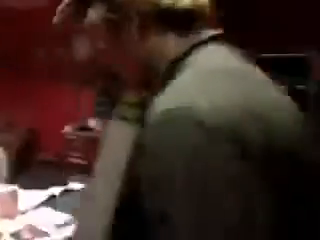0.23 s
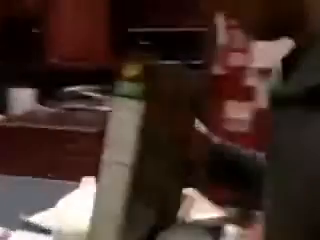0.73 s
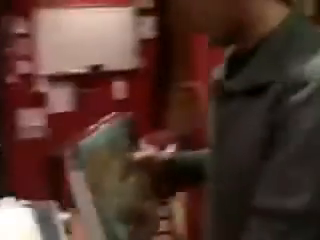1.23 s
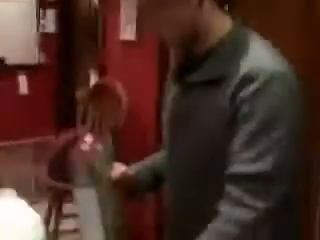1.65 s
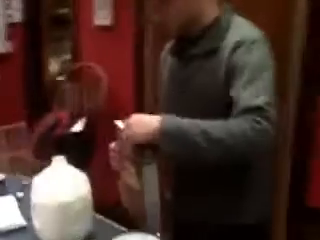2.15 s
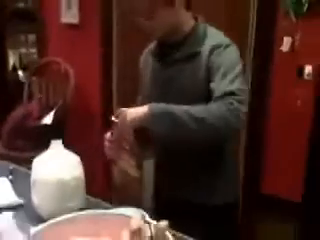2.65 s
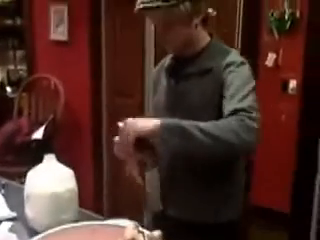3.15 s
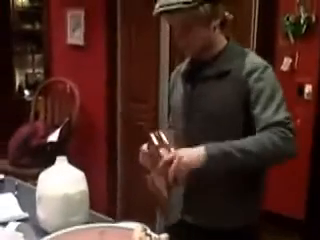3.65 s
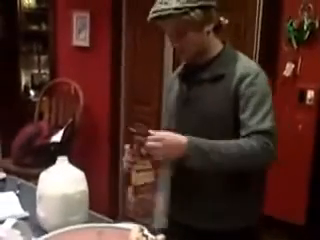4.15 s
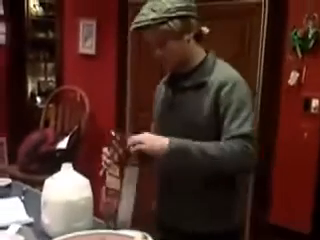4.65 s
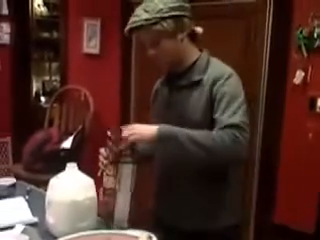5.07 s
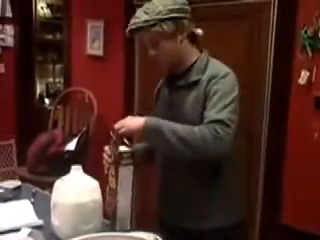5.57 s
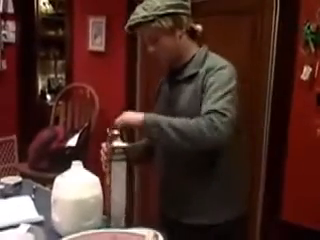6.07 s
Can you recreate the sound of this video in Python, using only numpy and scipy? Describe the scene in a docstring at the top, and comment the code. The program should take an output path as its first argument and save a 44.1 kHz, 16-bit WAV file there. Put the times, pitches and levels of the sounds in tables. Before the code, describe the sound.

In a quiet kitchen, handling rumble and rustle, a bowl knocks down twice with bright clinks, then a cardboard box is pried open in crisp snaps.

```python
"""Bowl and cereal box in a hard kitchen

A bowl is knocked down twice on a counter: noise bursts thud, damped modes ring, each knock has a bright clink.
A cereal box is pried open: glue cracks as impulse bursts, fibres tear as grain streams, flaps thump the hollow box.
Fingers rub and tap box and bag as enveloped grains, above handling rumble, cloth, room noise and a faint hum.
Reflections follow blows, rubbing and tearing; a firm-kneed overload and a band limit act on the sum."""
import sys
import numpy as np
from scipy import signal
from scipy.fft import rfft, irfft
from scipy.io import wavfile

SR = 44100
rng = np.random.default_rng(int(sys.argv[2]) if len(sys.argv) > 2 else 0)


def to_wav(s):
    """Save 16-bit WAV."""
    ch = np.atleast_2d(s).T  # columns
    pcm = np.round(np.clip(ch, -1, 1) * 32767)  # PCM
    wavfile.write(sys.argv[1], SR, pcm.astype(np.int16))


N = 278271
TIME = np.arange(N) / SR

# Levels in the tables are relative: each source adds its own offset or normalises the spectrum.
# Spectrum of the room noise and hiss: f/Hz, level/dB
FLOOR_SPECTRUM = [(12, -20), (20, 6.5), (49, 1), (101, -7.5), (162, -6), (210, -7), (568, -14),
                  (664, -12.5), (1040, -21), (1610, -23.5), (1790, -26), (4590, -25.5), (6290, -15.5),
                  (9550, -40), (10300, -60.5), (13400, -83), (22000, -120)]
# Hum of a refrigerator: mean f/Hz, rms level/dB
HUM_TONES = [(57, -61.5), (148, -57)]
# Handling: t/s, rumble level/dB, cloth level/dB
HANDLING_LEVELS = [(0.0, -36, -41), (0.266, -48, -48.5), (0.412, -37, -53), (0.668, -47, -42),
                   (0.782, -44, -52), (1.042, -39, -47), (1.092, -51, -55), (1.198, -40, -56),
                   (1.3, -42, -55)]
# Spectrum of the sleeves: f/Hz, level/dB
CLOTH_SPECTRUM = [(60, -3), (140, 9), (300, -1.5), (700, -4), (1200, -26), (3000, -34)]
# Spectrum of the low handling rumble: f/Hz, level/dB
RUMBLE_SPECTRUM = [(8, -9), (25, 11), (45, -22), (80, -16.5), (160, -23), (400, -78)]
# Fingers sliding over box and bag: middle t/s, Gaussian width/s, level/dB, brightness/(dB per octave)
RUB_STROKES = [(0.1, 0.098, -42.5, -0.5), (0.37, 0.054, -38, 3), (0.638, 0.11, -42, -1.5),
               (0.912, 0.11, -44, -0.5), (1.128, .08, -45.5, 2.5), (1.976, 0.032, -41, 11),
               (2.21, 0.032, -40, 2.5), (3.245, 0.057, -42.5, 0.5), (3.501, .034, -47, -0.2),
               (4.36, 0.041, -42.5, 0.5), (4.562, 0.043, -40, -0.5), (5.124, 0.013, -31.5, 1),
               (5.342, 0.027, -37.5, 3), (6.123, 0.03, -46.5, 4)]
# Spectrum of hands sliding over cardboard and plastic, before tilting: f/Hz, level/dB
RUB_SPECTRUM = [(290, -50.5), (500, -3.5), (546, -19.5), (841, 1), (1110, -9), (2730, -6.5), (3700, -8.5),
                (6300, -2), (7060, -2.5), (8020, -21), (9100, -16.5), (9820, -38), (10300, -52),
                (13400, -77), (22000, -120)]
# Clearest crinkles of the bag and fingernail taps: t/s, level/dB
TICK_EVENTS = [(0.7223, -17), (0.8778, -30), (0.9247, -31.5), (1.9486, -32.5), (2.174, -36.5),
               (2.488, -30.5), (3.3857, -30), (4.1327, -40), (4.8407, -35), (4.9879, -33), (5.0835, -29.5),
               (5.1058, -27), (5.3622, -25), (5.5115, -32), (6.2314, -28)]
# Bumps of the hands on the box: t/s, level/dB, stiffness of the spot as a factor on f
BUMP_EVENTS = [(0.7231, -24.5, 0.56), (2.051, -42.5, 1.19), (4.344, -41, 0.47), (4.56, -42.5, 0.96),
               (5.335, -42, 1.26), (5.731, -45.5, 1.33), (5.950, -32, 0.92)]
# Contacts of bowl and counter: t/s, rim level/dB, base level/dB, hard-edge level/dB, clink level/dB
BOWL_CONTACTS = [(1.3430, -12, -16.5, -15.5, -11), (1.385, -17.5, -16, -23, -36),
                 (1.6746, -32.5, -29.5, -41, -40), (1.6850, -19, -22, -23.5, -21.5),
                 (1.7040, -19.5, -26, -27.5, -42)]
# Modes of counter and bowl: f/Hz, level/dB, undamped 60 dB decay time/s
COUNTER_MODES = [(167.5, -22, 0.22), (242, -22, .18), (306.7, -4.5, 0.27), (456, -2.5, 0.1), (596, 1, 0.23),
                 (625.4, 2, 0.14), (614, -10, 0.23), (750, -1, 0.17), (889, 0, 0.13), (985, -16, 0.079),
                 (1080, -22, 0.048), (1326, -9.5, 0.16), (1823, -1.5, 0.046), (3040, -22, 0.26),
                 (3120, -11, 0.049)]
# Modes of the clink: f/Hz, level/dB, 60 dB decay time/s
CLINK_MODES = [(6880, 3.5, 0.083), (9200, -14.5, 0.066)]
# Spectrum of the thud of rim and base: f/Hz, level/dB
THUD_SPECTRUM = [(40, -18), (110, -11.5), (240, 2), (400, -2.5), (700, 1.5), (950, 1), (1500, -16),
                 (2500, -33.5), (5000, -36.5), (10000, -53)]
# Spectrum of the rim's hard edge: f/Hz, level/dB
EDGE_SPECTRUM = [(100, 0.5), (700, -6), (1800, 4.5), (3000, 4), (4500, -0.5), (6400, 3.5), (7600, -6.5),
                 (9500, -27.5), (11000, -42)]
# Flaps giving way: t/s, crack level/dB, crack decay/s, box thump level/dB, tear level/dB,
# tear length/s, brightness/(dB per octave), level of the grip before it/dB
FLAP_SNAPS = [(2.7704, -13, .0011, -21.5, -24, 0.023, 2.5, -43),
              (3.4426, -31, 0.0016, -49.5, -46, 0.033, 3.5, -45.5),
              (3.6184, -28, 0.0044, -39, -33, 0.02, -0.5, -67),
              (3.7524, -24, 0.005, -30, -25, 0.052, -1, -39),
              (5.138, -14, 0.0022, -25.5, -30.5, 0.018, 0.5, -59),
              (5.856, -37.5, 0.0058, -39, -31, 0.022, 6, -49),
              (5.871, -22, 0.0094, -37, -23.5, 0.029, 1, -58),
              (6.2401, -38.5, .0025, -39.5, -33, 0.053, 2.5, -55),
              (6.3068, -15.5, 0.0047, -33.5, -26, .01, 5, -46)]
# Spectrum of cracking glue, fibres and crinkles, before tilting: f/Hz, level/dB
CRACK_SPECTRUM = [(150, -29), (700, -9.5), (1200, -16.5), (2000, -9.5), (2800, -12.5), (4000, -10),
                  (5200, -4.5), (6200, 1), (7000, -3), (7700, -13.5), (9000, -18.5), (10500, -43.5)]
# Spectrum of the hollow box, before any stiffness factor: f/Hz, level/dB
BOX_SPECTRUM = [(50, -32), (140, -8), (260, -1), (380, -3), (560, -8), (790, 0.5), (920, -4), (1100, -14),
                (2000, -17.5), (5000, -50)]
# Reverberation of the room: f/Hz, 60 dB decay time/s
ROOM_DECAY = [(100, 0.38), (300, 0.61), (800, 0.53), (2500, 0.6), (5000, 0.52), (7000, 0.48), (10000, 0.52)]

FLOOR_DB = -46
GRIP_LEAD_S, GRIP_WIDTH_S, GRIP_DB_PER_OCTAVE = 0.05, 0.077, 3.1  # fingers slide before each snap
NEAR_ROOM_DB, FAR_ROOM_DB, WALK_S = -6.5, 0, (0.85, 3.8)  # the box is carried into the room's sound
BOWL_ROOM_DB, BASE_LAG_S = 1.5, 0.01  # the base comes down just after the rim
CATCH_S, CATCH_DB = 0.0043, -6.5  # the glue catches again at even steps, weaker each time
FIBRES_PER_S, TEAR_SWELL_DB = 300, 2  # a tear grows as it runs, then stops
THUMP_LAG_S, REBOUND_S, REBOUND_DB = 0.003055, 0.02, -5  # the flap hits the box, and once more
CUTOFF_HZ = 10150


def amp(db):
    """Logarithmic level: decibels become an amplitude ratio."""
    return 10 ** (np.asarray(db) / 20)


def unit(x):
    """Root-mean-square normalisation to 1."""
    return x / np.sqrt(np.mean(x ** 2) + 1e-20)


def blow(x):
    """Energy normalisation: the energy of a hundredth of a second at rms 1."""
    return x * np.sqrt(SR / 100 / np.sum(x ** 2))


def read(points, hz):
    """Logarithmic frequency scale: interpolates a table along it."""
    f, value = np.transpose(points)
    return np.interp(np.log(hz + 1), np.log(f + 1), value)


def causal(gain):
    """Minimum phase: the fastest-starting spectrum of this gain, over the full circle of frequencies."""
    return np.exp(np.conj(signal.hilbert(np.log(gain + 1e-5))))


def colour(x, points, size=4096):
    """Linear filtering: convolution with the minimum-phase response of a spectrum."""
    gain = amp(read(points, abs(np.fft.fftfreq(size, 1 / SR))))
    taps = np.fft.ifft(causal(gain)).real
    return signal.fftconvolve(x, taps[:size // 2])


def tilted(points, brightness, uneven_db=0):
    """Spectral tilt in dB per octave, with random unevenness as each spot of cardboard has."""
    hz, db = np.transpose(points)
    tilt = brightness * np.log2(hz / hz[0])
    return np.column_stack([hz, db + tilt + uneven_db * rng.standard_normal(len(hz))])


def noise(points):
    """Stationary random noise: white noise shaped to a spectrum, at rms 1."""
    white = rfft(rng.standard_normal(N))
    gain = amp(read(points, np.fft.rfftfreq(N, 1 / SR)))
    return unit(irfft(white * gain, N))


def grains(per_s, grain_db, points, size):
    """Shot noise: a random stream of coloured clicks of uneven size, at rms 1."""
    sizes = amp(grain_db * np.minimum(rng.exponential(1, size), 3)) * rng.choice([-1, 1], size)
    sounding = rng.random(size) < per_s / SR
    return unit(colour(sizes * sounding, points)[:size])


def burst(decay_s, grain_db, evenness=0.3, size=8192):
    """Decaying shot noise: uneven impulses, partly whitened so that little pitch remains."""
    sizes = amp(grain_db * np.minimum(rng.exponential(1, size), 4)) * rng.choice([-1, 1], size)
    spectrum = np.fft.fft(sizes * np.exp(-np.arange(size) / SR / decay_s))
    magnitude = abs(spectrum)
    ripple = causal((magnitude + magnitude.mean() / 10) ** evenness)
    return np.fft.ifft(spectrum / ripple).real[:size // 2]


def ring(modes):
    """Modal superposition: decaying sines, damped by the hand to a decay time of at most 0.2 s."""
    t = TIME[:SR // 2]
    total = np.zeros(len(t))
    for k, (hz, db, t60) in enumerate(modes):
        envelope = amp(db - 60 * t / min(t60, 0.2))
        total += (-1) ** k * envelope * np.sin(2 * np.pi * hz * t)
    return blow(total)


def kitchen(x, room_db, first_s=0.0017, build_s=0.0021, wall_gain=5.04, size=32768):
    """Reverberation: dense reflections of random sign, with a decay time that depends on frequency."""
    taps = np.zeros(size)
    at = np.arange(0, size - 10, 10)
    taps[at + rng.integers(0, 10, len(at))] = rng.choice([-1, 1], len(at))
    walls_s = rng.uniform(0.004, 0.06, size=7)
    taps[(walls_s * SR).astype(int)] = wall_gain * rng.choice([-1, 1], len(walls_s))  # near cupboards
    hz, t, bands = signal.stft(taps, SR, nperseg=256)
    decay = amp(-60 * t / read(ROOM_DECAY, hz)[:, None])
    tail = signal.istft(bands * decay, SR, nperseg=256)[1][:size]
    tail *= np.clip((TIME[:size] - first_s) / build_s, 0, 1)
    tail *= amp(room_db) / np.linalg.norm(tail)  # reflected energy against the direct path
    tail[0] = 1  # the direct path
    return signal.fftconvolve(x, tail)


def box_room(s):
    """Direct-to-reverberant ratio: the box's reflections gain on its direct sound with distance."""
    return np.interp(s, WALK_S, [NEAR_ROOM_DB, FAR_ROOM_DB])


def add(mix, s, sound):
    """Linear superposition: a sound joins the mix at a time."""
    part = mix[round(s * SR):][:len(sound)]
    part += sound[:len(part)]


def background(level_db=-0.5, waver_hz=1.38):
    """Stationary noise and frequency modulation: room noise and hiss, with a faint wavering hum."""
    drift = noise([(1, 0), (4, -6), (15, -60), (60, -120)])
    hum = np.zeros(N)
    for hz, db in HUM_TONES:
        phase = 2 * np.pi * np.cumsum(hz + waver_hz * drift) / SR  # waver is the rms deviation
        hum += amp(db) * np.sqrt(2) * np.sin(phase)
    return amp(FLOOR_DB + level_db) * noise(FLOOR_SPECTRUM) + hum


def handling(rumble_db=2.5, cloth_db=-1, stop_s=0.14):
    """Amplitude-modulated noise: rumble and cloth follow a hand's swing and die as it comes to rest."""
    s, low_db, sleeve_db = np.transpose(HANDLING_LEVELS)
    moving = np.clip((s[-1] - TIME) / stop_s, 0, 1)
    rumble = amp(rumble_db + np.interp(TIME, s, low_db)) * noise(RUMBLE_SPECTRUM)
    cloth = amp(cloth_db + np.interp(TIME, s, sleeve_db)) * noise(CLOTH_SPECTRUM)
    return moving * (rumble + cloth)


def rubbing(slips_per_s=3000, slip_db=-4, crinkles_per_s=55, crinkle_db=-10,
            room_db=-5.5, crinkle_room_db=-6):
    """Stick-slip friction: fine slips on cardboard and sparser bag crinkles swell and fade by stroke."""
    mix = np.zeros(N)
    grips = [(s - GRIP_LEAD_S, GRIP_WIDTH_S, grip_db, GRIP_DB_PER_OCTAVE)
             for s, *_, grip_db in FLAP_SNAPS]
    for middle, width, db, brightness in list(RUB_STROKES) + grips:
        start = max(middle - 0.2, 0)
        t = start + TIME[:SR // 2]
        pressure = amp(db) * np.exp(-((t - middle) / width) ** 2 / 2)
        slip_spectrum = tilted(RUB_SPECTRUM, brightness)
        slips = amp(slip_db) * grains(slips_per_s, 0.5, slip_spectrum, len(t))
        crinkle_spectrum = tilted(CRACK_SPECTRUM, brightness)
        crinkles = amp(crinkle_db) * grains(crinkles_per_s, 4, crinkle_spectrum, len(t))
        add(mix, start, kitchen(pressure * slips, room_db))
        add(mix, start, kitchen(pressure * crinkles, crinkle_room_db))
    return mix


def touches(tick_db=-11, tick_brightness=0.87, tick_room_db=-2, bump_room_db=3):
    """Impulse excitation: crinkles and nail taps are short and bright, bumps take the panel's colour."""
    mix = np.zeros(N)
    for s, db in TICK_EVENTS:
        spot = tilted(CRACK_SPECTRUM, tick_brightness, uneven_db=2.5)
        tick = blow(colour(burst(0.002, grain_db=5), spot))
        add(mix, s, kitchen(amp(db + tick_db) * tick, box_room(s) + tick_room_db))
    for s, db, stiffness in BUMP_EVENTS:
        panel = np.multiply(BOX_SPECTRUM, [stiffness, 1])  # a stiffer spot sounds higher
        bump = blow(colour(burst(0.0024, grain_db=3.5), panel))
        add(mix, s, kitchen(amp(db) * bump, box_room(s) + bump_room_db))
    return mix


def bowl(ring_db=-3.5, thud_db=-1, edge_room_db=-5.5, ring_room_db=-1, clink_room_db=-6.5):
    """Impact and modal response: rim and base thud and ring the counter; the rim adds edge and clink."""
    mix = np.zeros(N)
    for s, rim_db, base_db, edge_db, clink_db in BOWL_CONTACTS:
        for at, db in (s, rim_db), (s + BASE_LAG_S, base_db):
            ringing = amp(db + ring_db) * ring(COUNTER_MODES)
            add(mix, at, kitchen(ringing, BOWL_ROOM_DB + ring_room_db))
            thud = blow(colour(burst(0.0045, grain_db=5), THUD_SPECTRUM))
            add(mix, at, kitchen(amp(db + thud_db) * thud, BOWL_ROOM_DB))
        edge = blow(colour(burst(0.0075, grain_db=1.5), EDGE_SPECTRUM))
        add(mix, s, kitchen(amp(edge_db) * edge, BOWL_ROOM_DB + edge_room_db))
        add(mix, s, kitchen(amp(clink_db) * ring(CLINK_MODES), clink_room_db))
    return mix


def flaps(thump_room_db=2, tear_room_db=-1, late_db=-15, settle_s=0.035, count=3):
    """Fracture: glue cracks in quick steps, fibres tear and settle, the freed flap thumps the hollow box."""
    mix = np.zeros(N)
    t = TIME[:SR // 4]
    for s, crack_db, crack_s, thump_db, tear_db, tear_s, brightness, _ in FLAP_SNAPS:
        spot = tilted(CRACK_SPECTRUM, brightness, uneven_db=1.2)
        for k in range(count):
            crack = blow(colour(burst(crack_s, grain_db=5.5), spot))
            add(mix, s + k * CATCH_S, kitchen(amp(crack_db + k * CATCH_DB) * crack, box_room(s)))

        fibres = grains(FIBRES_PER_S, grain_db=4, points=spot, size=len(t))
        pull = amp(tear_db + TEAR_SWELL_DB * t / tear_s) * np.exp(-(t / tear_s) ** 4)
        add(mix, s, kitchen(pull * fibres, box_room(s) + tear_room_db))

        for lag_s, db in (THUMP_LAG_S, thump_db), (THUMP_LAG_S + REBOUND_S, thump_db + REBOUND_DB):
            thump = blow(colour(burst(0.006, grain_db=2), BOX_SPECTRUM))
            add(mix, s + lag_s, kitchen(amp(db) * thump, box_room(s) + thump_room_db))

        late_spot = tilted(CRACK_SPECTRUM, brightness, uneven_db=3)
        late_fibres = grains(160, grain_db=2, points=late_spot, size=len(t))
        add(mix, s, amp(crack_db + late_db) * late_fibres * np.exp(-t / settle_s))  # no reflections
    return mix


def scene():
    """Linear superposition of all sources at one microphone."""
    return (background() + handling() + rubbing() + touches() + bowl() + flaps())[None]


def record(dry):
    """Saturation and band limiting: the input overloads with a firm knee, then a low-pass acts."""
    ceiling = 0.68  # of full scale
    clipped = dry / (1 + (dry / ceiling) ** 6) ** (1 / 6)
    low_pass = signal.firwin(255, CUTOFF_HZ, window=("kaiser", 8), fs=SR)
    return signal.oaconvolve(clipped, low_pass[None], "same")


dry = scene()
out = record(dry)
to_wav(out)
```